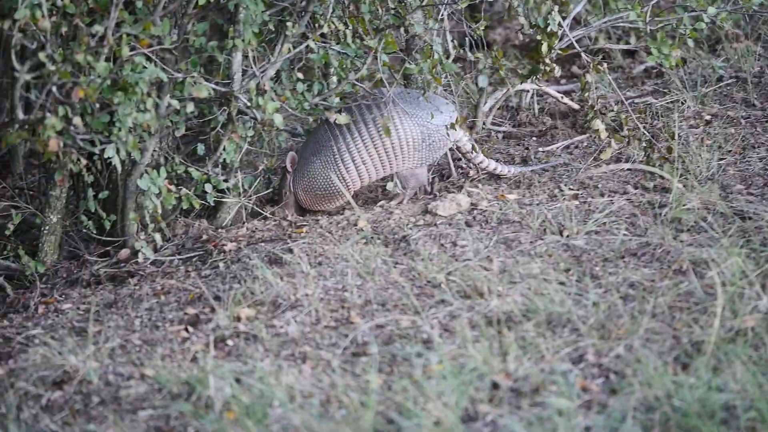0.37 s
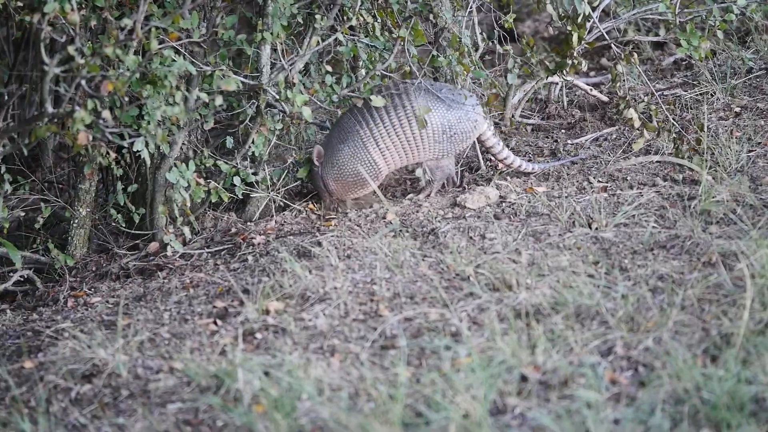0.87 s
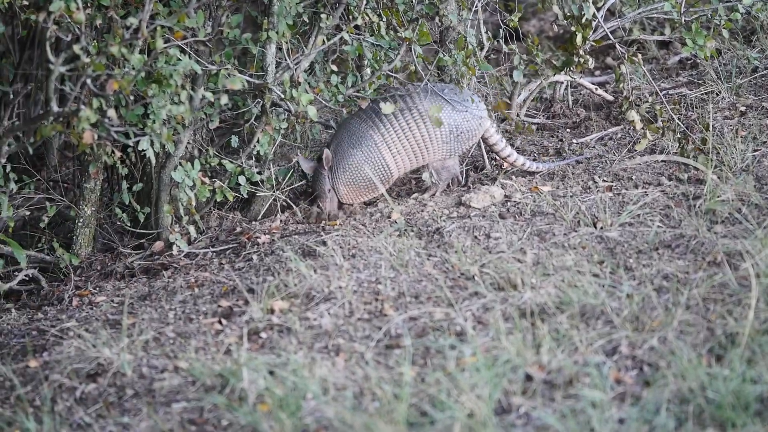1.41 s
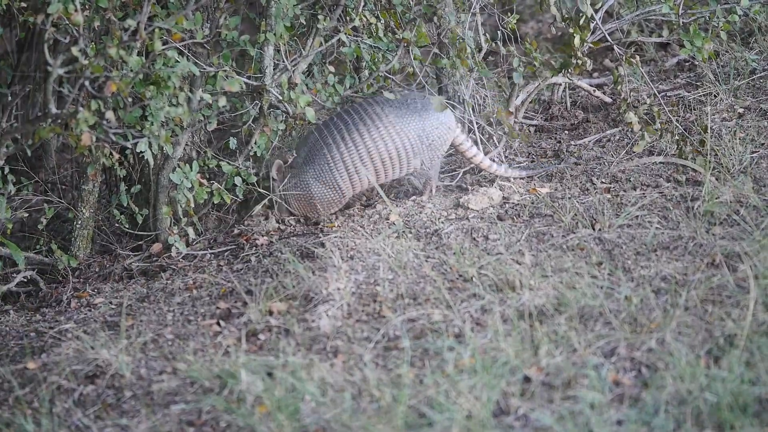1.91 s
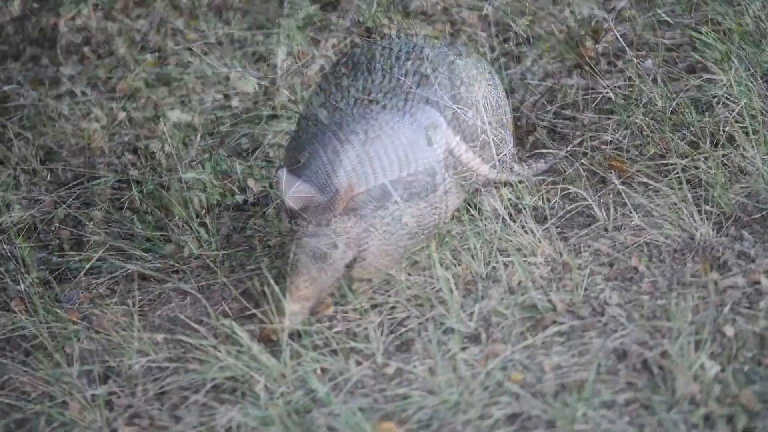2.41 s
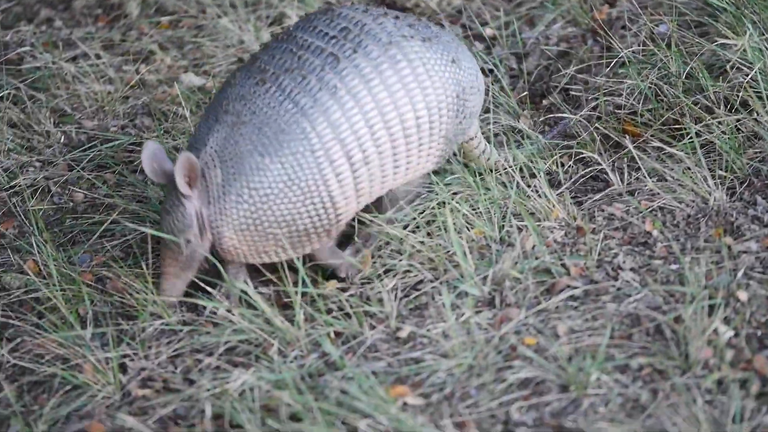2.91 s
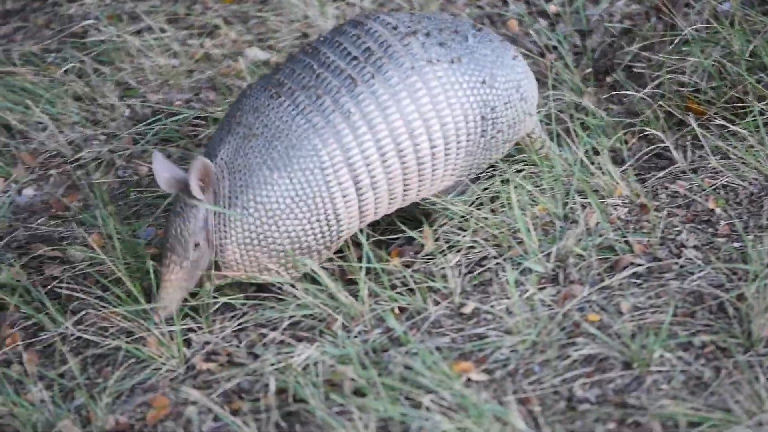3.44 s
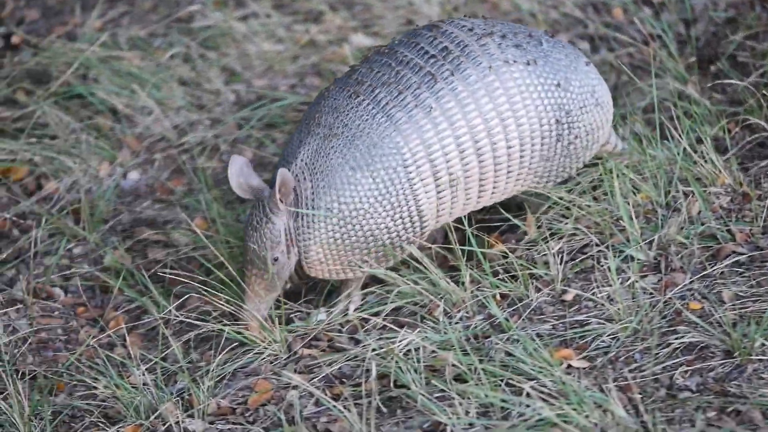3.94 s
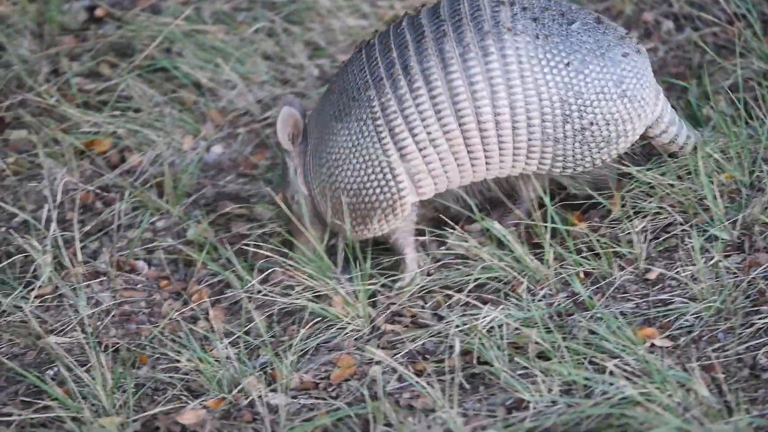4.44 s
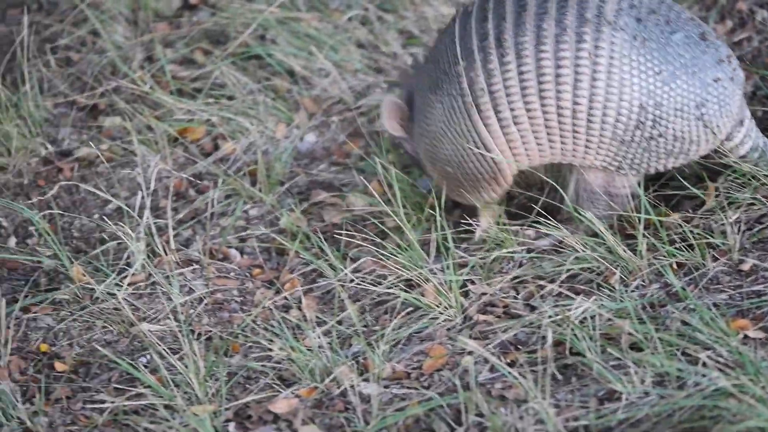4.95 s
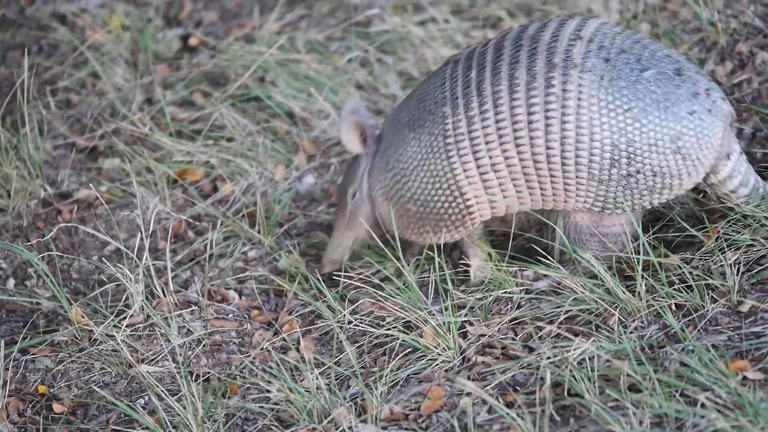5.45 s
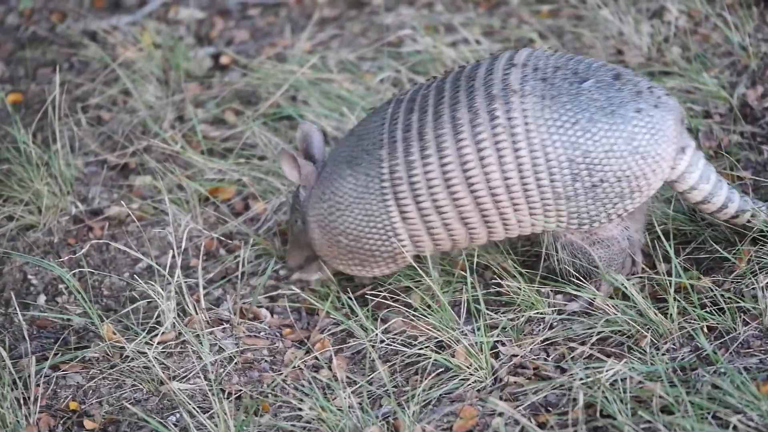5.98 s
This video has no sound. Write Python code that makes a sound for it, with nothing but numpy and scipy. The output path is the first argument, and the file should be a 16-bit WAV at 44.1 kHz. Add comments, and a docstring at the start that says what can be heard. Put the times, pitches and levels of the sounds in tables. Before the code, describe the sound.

A ringing cricket trill with pulsed higher chirps, twigs snapping and leaves rustling under a rooting armadillo, dissolving midway into a much fainter cricket bed.

```python
"""Tree crickets trill at dusk by a thicket, while a small animal crunches and rustles through dry brush.
Field crickets chirp in groups of notes that fall in pitch, and the animal gives one short grunt.
A louder listening spot dissolves into a quieter one. Crickets are gliding tones with echoes; air, drone and
rustle are shaped noise; twigs are puffs of noise; the grunt is a few falling tones made rough."""
import sys
import numpy as np
from scipy import signal
from scipy.io import wavfile
from scipy.ndimage import uniform_filter1d

SR = 44100
rng = np.random.default_rng(int(sys.argv[2]) if len(sys.argv) > 2 else 0)


def field_ratio(decibels):
    """Amplitude ratio for a level in dB (20 dB per decade); scalars and array-likes work."""
    return 10 ** (np.asarray(decibels, dtype=float) / 20)


def transcribe(u):
    """Save the signal u as a 16-bit wav file named by the first command-line argument.

    u: samples, shape (n,) or (channels, n), limited to [-1, 1]; the rate is SR.
    q: integer samples, one column per channel.
    """
    v = np.clip(np.atleast_2d(u).T, -1, 1)
    q = np.round(v * 32767).astype(np.int16)
    wavfile.write(sys.argv[1], SR, q)


N = 268833
T = np.arange(N) / SR


def in_time(rows):
    """Columns of a table joined by straight lines in time."""
    s, *columns = np.transpose(rows)
    return [np.interp(T, s, c) for c in columns]


def band(x, low_hz, high_hz):
    """Keeps the part of a sound between two pitches (Butterworth band-pass)."""
    sos = signal.butter(2, [low_hz, min(high_hz, .45 * SR)], "band", fs=SR, output="sos")
    return signal.sosfilt(sos, x)


def rms_one(x):
    """Scales to an rms of 1."""
    return x / np.sqrt(np.mean(x ** 2) + 1e-20)


def drift(rate):
    """Slow random wandering: straight lines between random points of spread 1, two per cycle of the rate (Hz)."""
    knots = rng.standard_normal(400)
    return np.interp(T * rate * 2, np.arange(400), knots)


def dissolve():
    """Gains of the first and second spot: one fades out as the other fades in, along bent ramps."""
    start_s, end_s = 1.753, 2.91
    u = np.clip((T - start_s) / (end_s - start_s), 0, 1)
    return (1 - u) ** 1.106, u ** 0.44


# air and distant rumble, before flicker and swell:
# pitch_hz, first_spot_level (dB per Hz), second_spot_level (dB per Hz)
AIR_SPECTRUM = [(25, -73, -87), (52, -70.5, -88.5), (101, -62, -85), (148, -66.5, -92), (223, -66, -94.5),
                (286, -75.5, -96.5), (347, -72, -95.5), (500, -81.5, -99), (826, -89, -101),
                (1330, -90, -101), (1860, -90.5, -105), (2200, -81.5, -96), (3500, -86.5, -102),
                (4000, -89.5, -110), (5100, -96.5, -113), (6800, -100, -115), (16170, -100, -117)]
# the low rumble swells once: time_s, gain_db
RUMBLE_SWELL = [(0, 1), (1, -0.5), (1.4, 2.5), (1.8, -1), (6.1, 0)]


def air(first, second, patchy_db):
    """Third-octave bands of noise, each with its own flicker, coloured for both spots."""
    out = 0
    edges = 20 * 2 ** (np.arange(31) / 3)
    white = rng.standard_normal((2, N))
    hz, *spots = np.transpose(AIR_SPECTRUM)
    rumble = field_ratio(in_time(RUMBLE_SWELL)[0])
    for k, (low, high) in enumerate(zip(edges, edges[1:])):
        log_centre = np.log(low * high) / 2
        a, b = (field_ratio(np.interp(log_centre, np.log(hz), db)) for db in spots)
        swell = rumble if high < 420 else 1
        flicker = field_ratio(patchy_db * drift(5))
        out = out + swell * np.hypot(a * first, b * second) * flicker * band(white[k % 2], low, high)
    return out * np.sqrt(SR / 2)    # from level per Hz to level of the noise


# swelling of the drone at the second spot: time_s, level_db
DRONE_SWELL = [(0, -76), (3.6, -76.5), (3.85, -73), (4.4, -71.5), (4.8, -65.5), (5.1, -75), (5.6, -70.5),
               (6.1, -72.5)]


def far_drone(first, second):
    """A dull band of noise far off: steady at the first spot, swelling at the second."""
    gain = np.hypot(first * field_ratio(-59), second * field_ratio(in_time(DRONE_SWELL)[0]))
    return gain * rms_one(band(rng.standard_normal(N), 602, 930))


# echoes off trunks and ground, before each source's own echo gain and the treble loss: delay_s, level_db
TRUNK_ECHOES = [(0.015, -12), (0.02, -16.5), (0.027, -11.5), (0.033, -15.5), (0.076, -28)]


def thicket(x, echo_db, scatter_db, t60_s, blur_s=0.0021):
    """A few echoes, each blurred by twigs, and a dying scatter from leaves; both lose their treble."""
    t = T[:SR // 2]
    noise = rng.standard_normal((2, SR // 2))
    tail = noise[0] * field_ratio(-60 * t / t60_s) * (t > .004)
    tail *= field_ratio(scatter_db) / np.sqrt(np.sum(tail ** 2))
    for s, db in TRUNK_ECHOES:
        echo = noise[1] * np.exp(-((t - s) / blur_s) ** 2)
        tail += field_ratio(db + echo_db) * echo / np.sqrt(np.sum(echo ** 2))
    tail = signal.lfilter([.55], [1, -.45], tail)
    return x + signal.fftconvolve(x, tail)[:N]


# gain of the rustle at the first spot: time_s, gain_db
ROOTING_GAIN = [(0, -55.5), (.1, -67.5), (.27, -63.5), (.58, -61.5), (.85, -67), (1.2, -66.5),
                (1.32, -59.5), (1.55, -62.5), (1.82, -59), (2.05, -60.5), (2.3, -59), (2.5, -57.5),
                (2.9, -63)]


def rooting(first, second):
    """Dense grains of uneven size in clumps: bright hiss of leaves over a duller crunch of soil."""
    sizes = field_ratio(3.4 * np.minimum(rng.exponential(1, N), 4)) * rng.standard_normal(N)
    grains_per_s = 9000 * field_ratio(3 * drift(11))
    grains = sizes * (rng.random(N) < grains_per_s / SR)
    leaves = rms_one(band(grains, 2800, 12300)) * field_ratio(2.2 * drift(12) + 1.5 * drift(4.04))
    soil = rms_one(band(grains, 1156, 1610)) * field_ratio(4.1 * drift(14))
    gain = np.hypot(first * field_ratio(in_time(ROOTING_GAIN)[0]), second * field_ratio(-84))
    return gain * (field_ratio(2.5) * leaves + field_ratio(3.5) * soil)


def burst(events, length_s):
    """A short puff of noise around each event (s, dB), swelling and sinking alike."""
    clicks = np.zeros(N)
    clicks[[round(s * SR) for s, db in events]] = field_ratio(np.array(events)[:, 1])
    puff = np.exp(-(np.arange(-800, 801) / SR / length_s) ** 2)
    return signal.fftconvolve(clicks, puff, "same") * rng.standard_normal(N)


def snaps(rows):
    """Twigs and clods crunch around 1.4 kHz, dry stalks tick: puffs of noise with a broad bright edge."""
    rows = np.array(rows)
    crunch = band(field_ratio(5) * burst(rows[:, [0, 1]], 0.003), 1034, 1670)
    bright_edge = band(burst(rows[:, [0, 2]], 0.004), 1900, 8900)
    return crunch + bright_edge


def small_snaps(per_s, crunch_db, spread_db, below_db):
    """Lesser snaps at random gaps, as rows of time, crunch and bright edge like the snap table."""
    luck = rng.random((80, 3))
    s = np.cumsum(-np.log(1 - luck[:, 0]) / per_s)
    db = crunch_db + spread_db * (2 * luck[:, 1] - 1)
    edge_db = db - below_db * (.5 + luck[:, 2])
    return np.transpose([s, db, edge_db])[s < T[-1]]


# the clearest snaps, levels before filtering and the crunch gain: time_s, crunch_db, bright_edge_db
CLEAR_SNAPS = [(0.0623, -32, -51), (0.2334, -53, -45.5), (0.3546, -47, -66), (0.565, -35, -42.5),
               (0.979, -39, -63), (1.2096, -43, -54), (1.2286, -32.5, -57), (1.2987, -32, -48),
               (1.3912, -39, -56), (1.4365, -33.5, -58), (1.696, -37, -45), (1.754, -33.5, -45.5),
               (1.8038, -51, -46), (1.8492, -42, -43), (1.9679, -35.5, -42.5), (2.123, -40, -64),
               (2.2732, -55, -47), (2.369, -55, -45.5), (2.4612, -39, -44.5), (2.6307, -46, -70),
               (3.4241, -53, -68), (3.489, -51, -62), (3.636, -44, -74), (3.8681, -48, -72),
               (4.596, -58, -60), (5.1986, -65, -61), (5.3652, -58, -68)]


def twigs(first, second):
    """Clear snaps at set times, and lesser random ones that fade with each spot."""
    lesser_first = small_snaps(per_s=9.0, crunch_db=-45.5, spread_db=5, below_db=15)
    lesser_second = small_snaps(per_s=5, crunch_db=-56, spread_db=5.0, below_db=21)
    return snaps(CLEAR_SNAPS) + first * snaps(lesser_first) + second * snaps(lesser_second)


# one grunt: start_s, length_s, gain_db
GRUNT_EVENT = (.378, 0.0413, -33)
# its falling resonances, one a row: start_hz, end_hz, relative_level_db
GRUNT_RESONANCES = [(860, 540, 0), (990, 800, -5), (660, 560, -12)]


def grunt():
    """A short nasal grunt: falling tones whose strength is roughened by low-pitched noise."""
    s, length, db = GRUNT_EVENT
    u = np.clip((T - s) / length, 0, 1)
    swell = np.minimum(u / .06, 1) * np.minimum((1 - u) / .4, 1) ** .8
    rough = 1 + 0.4 * rms_one(band(rng.standard_normal(N), 70, 207))
    tones = 0
    for start_hz, end_hz, level_db in GRUNT_RESONANCES:
        cycles = length * u * (start_hz + (end_hz - start_hz) * u / 2)
        tones = tones + field_ratio(level_db) * np.sin(2 * np.pi * cycles)
    return field_ratio(db) * swell * rough * tones


def trill(per_s, begin_s, start_hz, end_hz, peak_db, octave_db):
    """Each wing stroke is a short gliding tone with overtones; strength and phase are new each stroke."""
    stroke_s = 0.02193
    count = (T - begin_s) * per_s
    stroke = np.floor(count).astype(int)
    luck = rng.random((200, 2))[stroke % 200]
    u = np.minimum((count - stroke) / per_s / stroke_s, 1)    # 0 to 1 through the stroke
    cycles = stroke_s * u * (start_hz + (end_hz - start_hz) * u / 2)
    turn = 2 * np.pi * (cycles + luck[:, 0])
    swell = np.sin(np.pi * u ** 1.01) ** 0.68 * field_ratio(peak_db + 5.3 * (luck[:, 1] - .5))
    third = field_ratio(octave_db - 13.5)
    return swell * (np.sin(turn) + field_ratio(octave_db) * np.sin(2 * turn) + third * np.sin(3 * turn))


# when the low cricket trills: start_s, length_s
LOW_BURSTS = [(2.64, .15), (3.15, .24), (3.77, .15), (4.33, .12), (4.88, .14), (5.37, .16), (5.92, .15)]


def low_cricket():
    """Bursts of short pulses on one low pitch."""
    gate = sum(1. * ((T > s) & (T < s + length)) for s, length in LOW_BURSTS)
    pulses = trill(33.0, .01, 2315, 2265, 0, -50)
    return field_ratio(-52) * uniform_filter1d(gate, size=300) * pulses


def chorus(start_hz, spread_hz, fall_hz, peak_db, octave_db, count=5):
    """A group of crickets further off, each with its own pace and pitch."""
    pitches = start_hz + spread_hz * rng.permutation(np.linspace(-1, 1, count))
    paces = np.linspace(22.4, 27.2, count) + rng.uniform(-.3, .3, count)    # strokes per s
    singers = zip(paces, pitches)
    return sum(trill(p, -rng.random(), hz, hz - fall_hz, peak_db, octave_db) for p, hz in singers)


# groups of main, lower and higher singers at each spot; peak is a middling stroke of one singer:
# start_hz, spread_hz, fall_hz, peak_db, octave_db (relative to the main tone)
CROWD_FIRST = [(2786, 66.4, 226, -37.5, -41), (2499, 159, 249, -50, -38), (3220, 225, 330, -53.5, -36)]
CROWD_SECOND = [(2717, 71, 168, -54, -28), (2565, 133, 303, -62.5, -22.5), (2977, 90, 210, -64.5, -24),
                (3315, 150, 160, -75, -38)]


def crowd(first, second):
    """The rest of the tree crickets: each spot has its own groups of overlapping trills."""
    return first * sum(chorus(*c) for c in CROWD_FIRST) + second * sum(chorus(*c) for c in CROWD_SECOND)


# tree crickets heard singly; peak is a middling stroke, octave is relative to the main tone:
# start_hz, end_hz, peak_db, octave_db
SOLO_TONES_FIRST = [(2868, 2600, -26, -33.5), (2755.4, 2510, -27.5, -31), (2448, 2190, -45, -36),
                    (3314, 3200, -60.5, -36)]
SOLO_TONES_SECOND = [(2770.6, 2500, -45.5, -23), (2751.6, 2560, -45, -23.5), (3365, 3325, -64.5, -40),
                     (3330, 3080, -66, -36)]
# their pace, in the same order: wing_strokes (per s), one_stroke_begins_s
SOLO_PACES_FIRST = [(23.26, -.002), (24.8, .025), (23.07, .004), (23.08, .005)]
SOLO_PACES_SECOND = [(24.0, 2.903), (23.33, 2.931), (23.59, 2.924), (24.2, 2.903)]


def solo_tree_crickets(first, second):
    """Tree crickets heard singly: steady trains of wing strokes that fall in pitch."""
    solos = first * sum(trill(*p, *c) for p, c in zip(SOLO_PACES_FIRST, SOLO_TONES_FIRST))
    solos += second * sum(trill(*p, *c) for p, c in zip(SOLO_PACES_SECOND, SOLO_TONES_SECOND))
    return solos


# length and fall of a note by its pitch, higher notes last longer: pitch_hz, length_s, drop_hz
NOTE_SHAPES = [(4112, 0.019, 204), (4160, 0.03, 150), (4310, 0.0383, 360), (4384, 0.0406, 650)]


def chirps(notes, bend, slip_hz, rise_s, start_db, end, second_db, third_db):
    """A note may slip down from above, swells on a held pitch, then drops away as the stroke ends."""
    out = np.zeros(N)
    pitches, lengths, drops = np.transpose(NOTE_SHAPES)
    for s, peak_db, hz in notes:
        length = np.interp(hz, pitches, lengths)
        u = np.arange(int(length * SR)) / (length * SR)     # 0 to 1 through the note
        slip = slip_hz * np.exp(-u * length / 0.00072)      # the first teeth pass fast
        drop = np.interp(hz, pitches, drops) * u ** bend
        turn = 2 * np.pi * np.cumsum(hz + 20 + slip - drop) / SR
        swell = np.minimum(u * length / rise_s, 1)
        rise = np.minimum(u * length / 0.00067, 1) * (field_ratio(start_db) + (1 - field_ratio(start_db)) * swell)
        fall = np.minimum((1 - u) / 0.47, 1) ** end
        overtones = field_ratio(second_db) * np.sin(2 * turn) + field_ratio(third_db) * np.sin(3 * turn)
        tone = np.sin(turn) + np.minimum(u / .5, 1) * overtones
        at = max(round((s - .005) * SR), 0)     # a note begins 5 ms ahead of its listed time
        out[at:at + len(u)] += field_ratio(peak_db) * rise * fall * tone
    return out


def sing(song, phrases, level_db=0):
    """Notes (s, peak dB, Hz) of a song repeated at each phrase's own beats and pitch."""
    notes = []
    for s, lead, beat, shift in phrases:
        for beats, db, hz in song:
            note_s = s + beats * (lead if beats < 0 else beat)
            notes.append((note_s, db + level_db, hz + shift))
    return [note for note in notes if note[0] > 0]


# songs of the far cricket (levels relative) and the faint one, soft lead-in if any, then full notes:
# beats_from_first_full_note, level_db, pitch_hz (before the phrase's shift)
FAR_SONG = [(-1.33, -9, 4090), (-.84, -7, 4100), (0, -1, 4400), (0.96, 0, 4400)]
FAINT_SONG = [(0, -65.5, 4310), (1, -67, 4330)]
# their phrases: first_full_note_s, lead_in_beat_s, full_note_beat_s, pitch_shift_hz
FAR_PHRASES_FIRST = [(0.0034, .11, 0.11, -15), (0.624, .11, 0.11, -20), (1.878, .113, .098, -25),
                     (2.5471, 0.11, 0.1, 0)]
FAR_PHRASES_SECOND = [(3.059, 0.092, .12, 0), (3.711, 0.11, 0.11, -38), (4.344, .107, .109, -8),
                      (5.03, .095, .12, -28), (5.6843, 0.11, 0.11, -30)]
FAINT_PHRASES = [(3.3657, 0, .07, 20), (3.983, 0, .076, 0), (4.58, 0, .083, -70), (5.221, 0, 0.085, 0),
                 (5.8726, 0, .075, 60)]


def far_field_crickets(first, second):
    """Softer chirps at both spots, with slow swells, no opening slip and weak overtones."""
    soft = dict(bend=2.86, slip_hz=0, rise_s=.016, start_db=-19, end=.6, second_db=-32, third_db=-45)
    notes_first = sing(FAR_SONG, FAR_PHRASES_FIRST, level_db=-38)
    notes_second = sing(FAR_SONG, FAR_PHRASES_SECOND, level_db=-59) + sing(FAINT_SONG, FAINT_PHRASES)
    return first * chirps(notes_first, **soft) + second * chirps(notes_second, **soft)


# song of the near cricket, soft lead-in then full notes:
# beats_from_first_full_note, level_db, pitch_hz (before the phrase's shift)
NEAR_SONG = [(-1.79, -46, 4080), (-1.39, -30, 4105), (-.87, -29.5, 4160), (0, -21.5, 4293),
             (1, -21.5, 4288)]
# its phrases: first_full_note_s, lead_in_beat_s, full_note_beat_s, pitch_shift_hz
NEAR_PHRASES = [(0.5447, .1135, .1129, 0), (1.3893, .111, .1117, 0), (2.0782, .1112, .1111, 0),
                (2.804, .106, .111, 0)]


def near_field_cricket(first):
    """Loud chirps at the first spot: each note slips in from above, holds and then drops."""
    notes = sing(NEAR_SONG, NEAR_PHRASES)
    return first * chirps(notes, bend=5.0, slip_hz=251, rise_s=0.015, start_db=-6, end=0.27,
                          second_db=-26.5, third_db=-20)


def scene():
    """Crickets ring through the thicket; both spots are mixed by the dissolve."""
    first, second = dissolve()
    background = air(first, second, patchy_db=1.86) + far_drone(first, second)
    animal = thicket(twigs(first, second) + grunt(), -21, -6.5, 0.066) + rooting(first, second)
    crickets = thicket(crowd(first, second), 2.1, -1.7, 0.45)
    crickets += thicket(solo_tree_crickets(first, second) + low_cricket(), -2.5, -9, 0.3)
    crickets += thicket(far_field_crickets(first, second), 12.1, -2, 0.62, blur_s=0.0063)
    crickets += thicket(near_field_cricket(first), 3, -10, 0.37, blur_s=0.0032)
    return (background + animal + crickets)[None]


def top_cut(x):
    """Nothing passes above about 16.9 kHz."""
    return signal.sosfilt(signal.butter(12, 16860, fs=SR, output="sos"), x)


def record(dry):
    """A steep low-pass filter cuts the top of the treble above 15750 Hz."""
    low_pass = signal.ellip(12, .2, 70, 15750, fs=SR, output="sos")
    mix = signal.sosfilt(low_pass, dry)
    return top_cut(mix)


dry = scene()
out = record(dry)
transcribe(out)
```